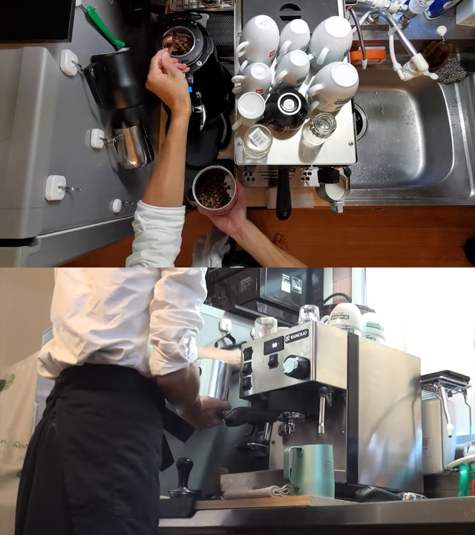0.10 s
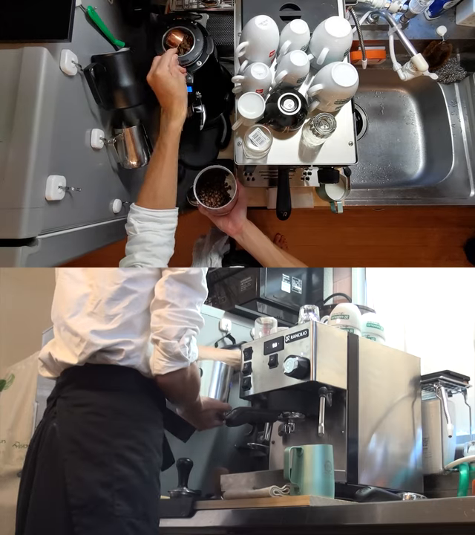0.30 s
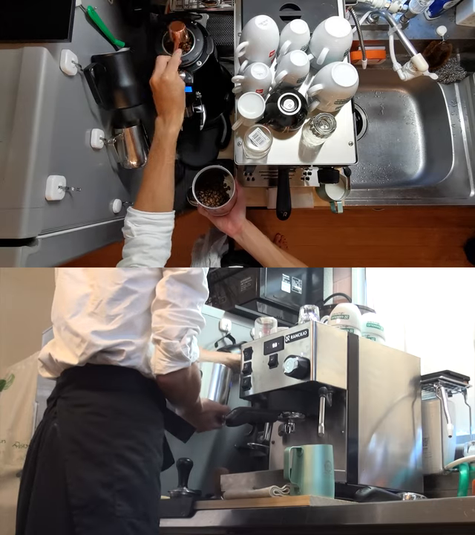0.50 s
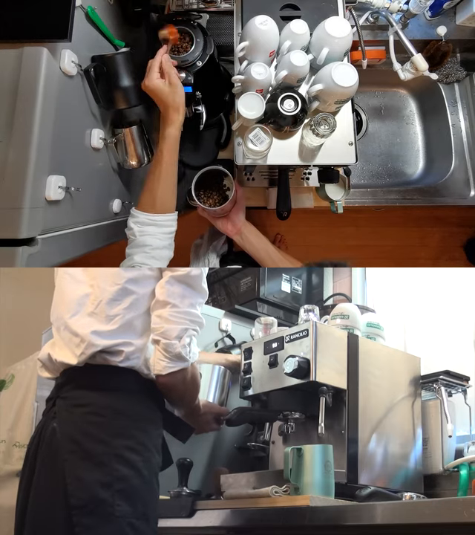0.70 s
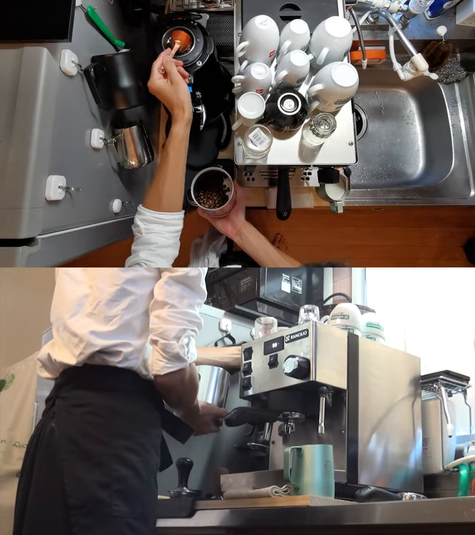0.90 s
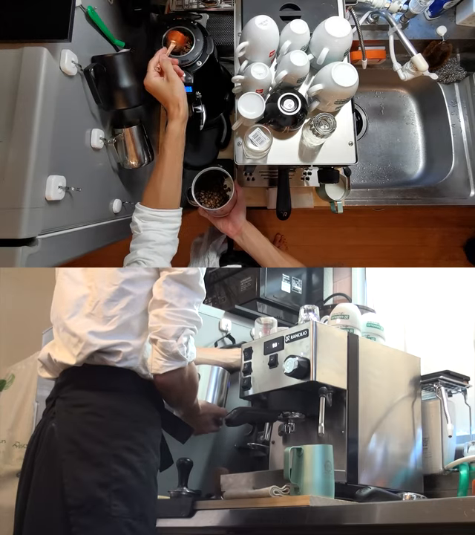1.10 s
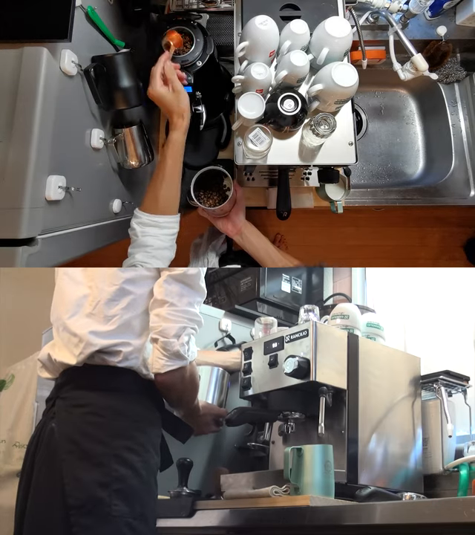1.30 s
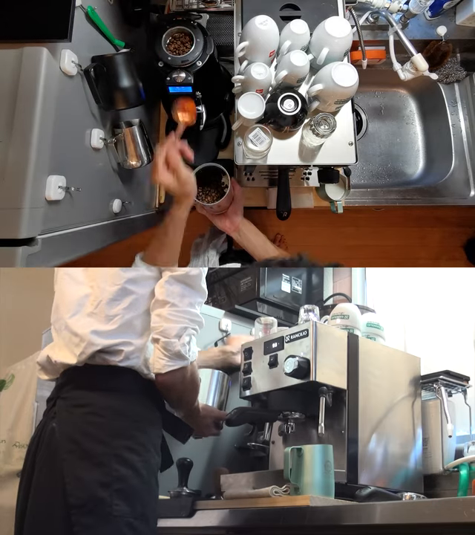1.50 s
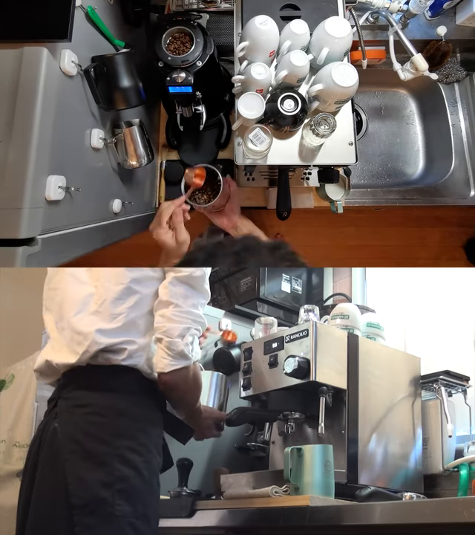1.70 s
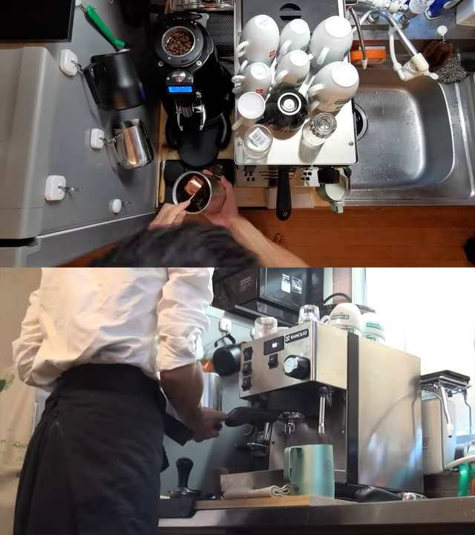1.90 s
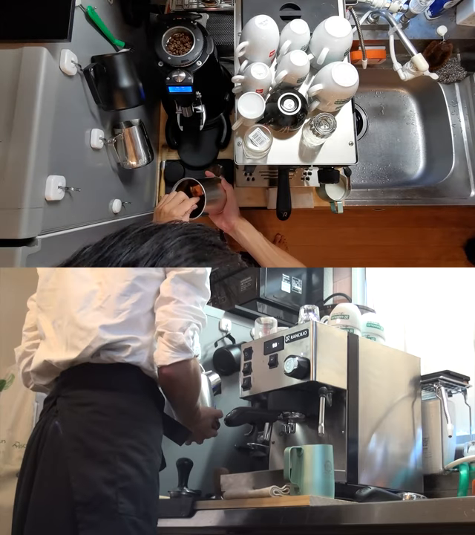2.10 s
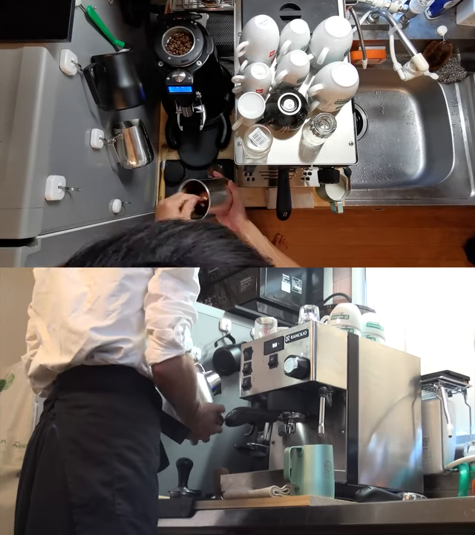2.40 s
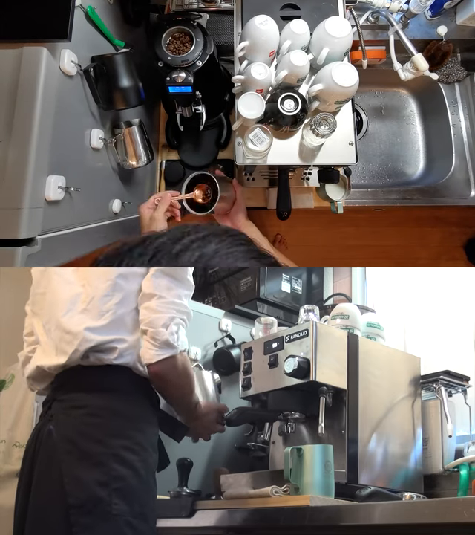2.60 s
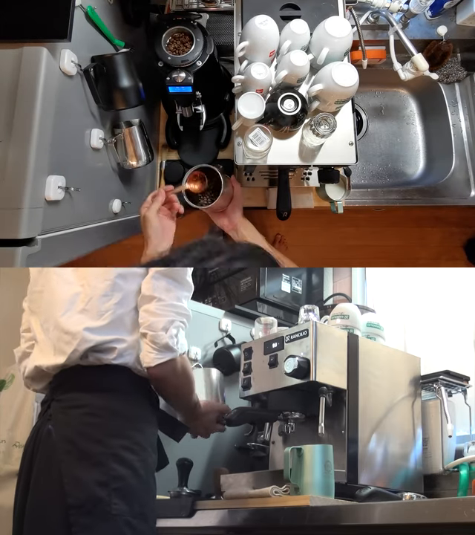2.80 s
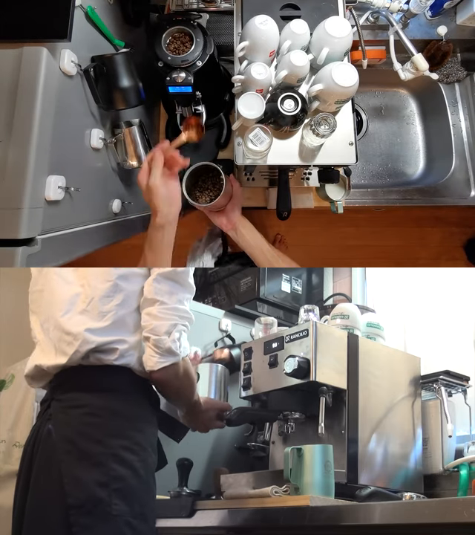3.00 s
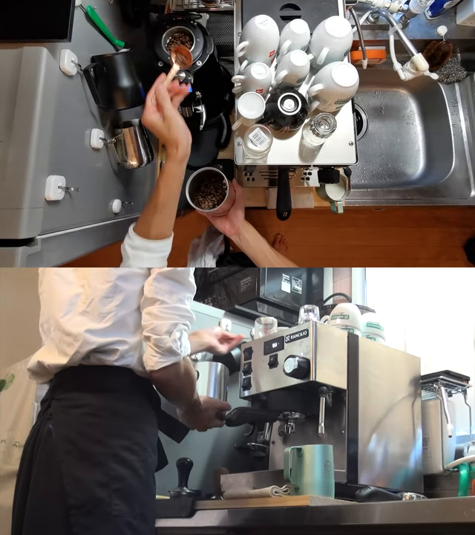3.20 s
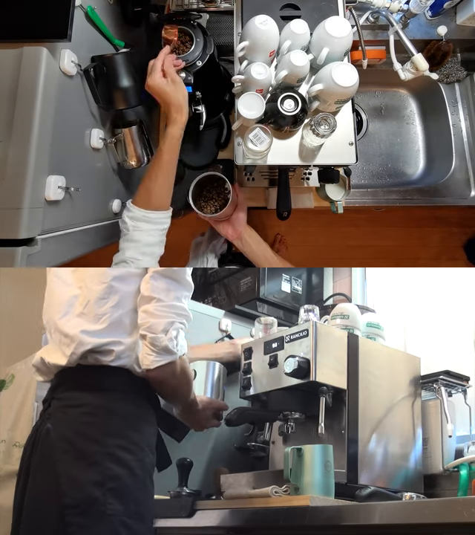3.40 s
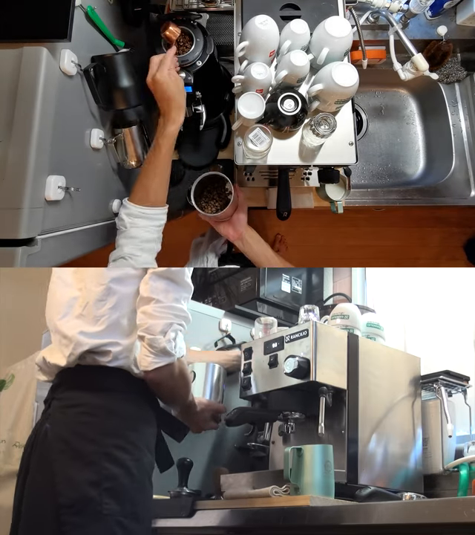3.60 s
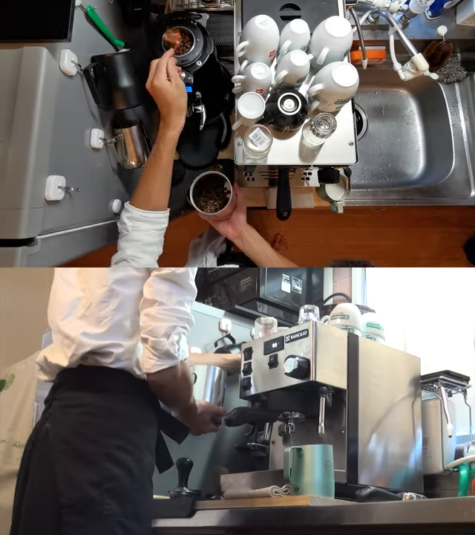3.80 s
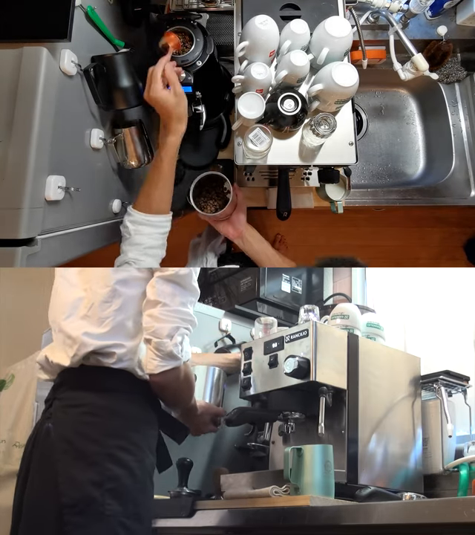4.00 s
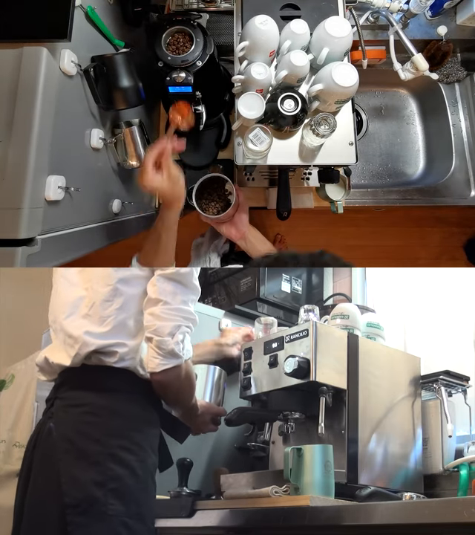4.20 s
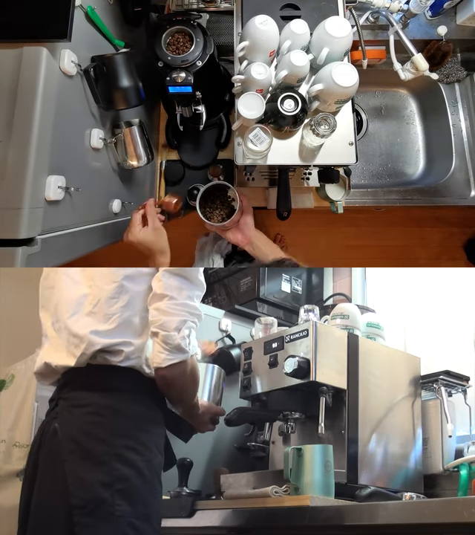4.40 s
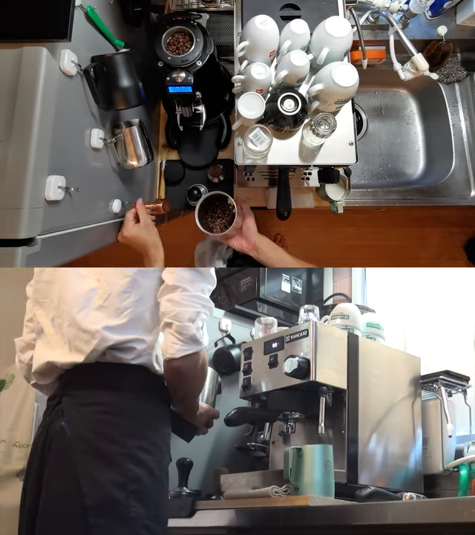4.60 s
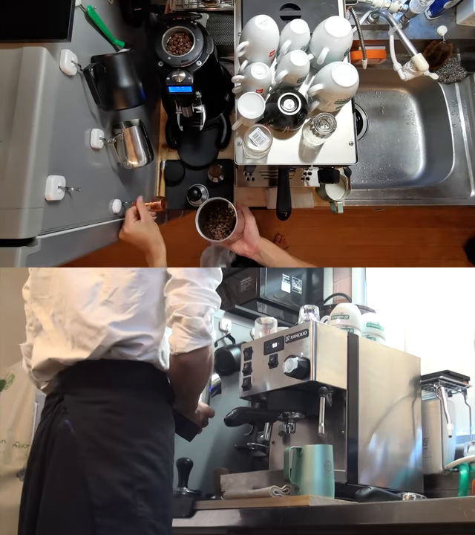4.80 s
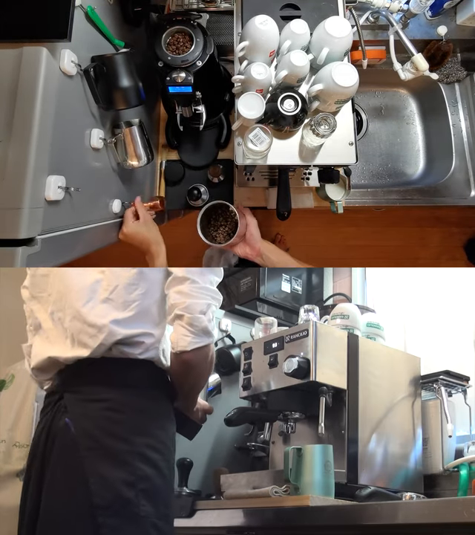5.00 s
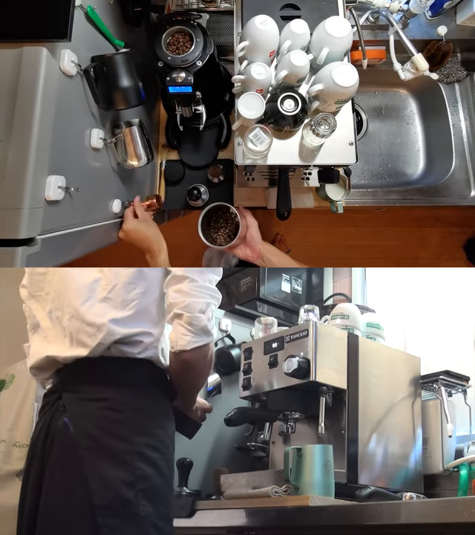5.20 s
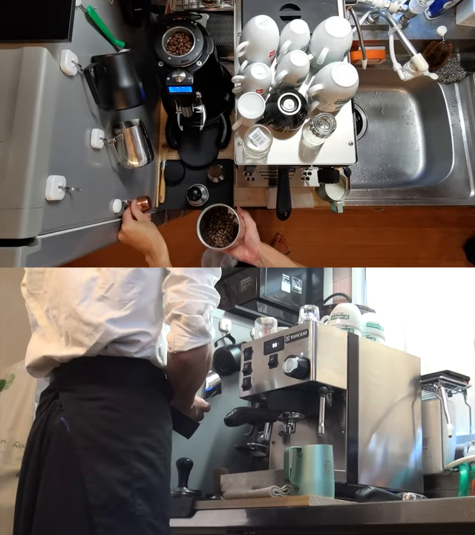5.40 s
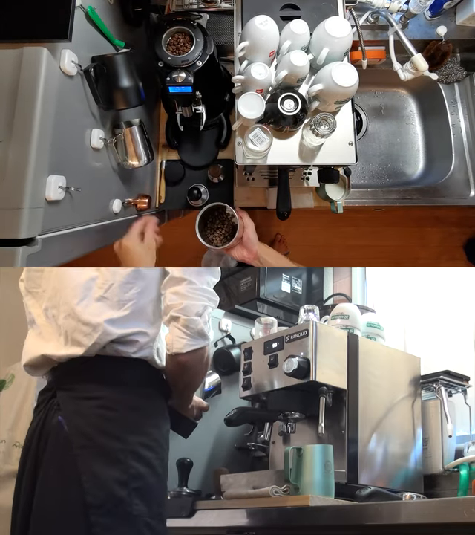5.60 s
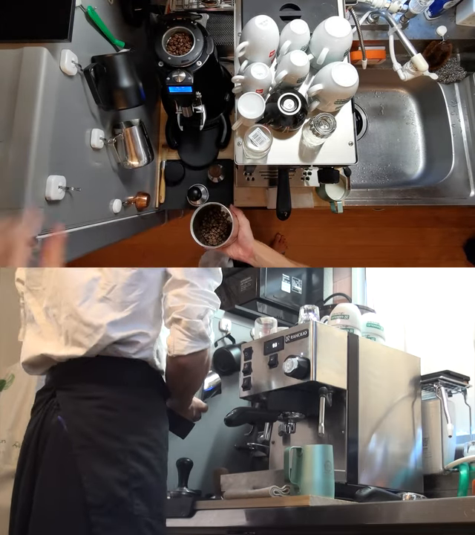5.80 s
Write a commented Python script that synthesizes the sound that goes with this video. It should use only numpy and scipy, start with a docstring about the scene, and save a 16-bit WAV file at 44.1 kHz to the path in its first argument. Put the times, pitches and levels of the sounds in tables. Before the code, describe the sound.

In a small kitchen, a metal spoon knocks a plastic grinder hopper and coffee beans patter in, followed by light scrapes and dull bumps. The spoon crunches into beans in a steel cup, clacking against its wall, and a few more beans tick into the hopper. Finally the spoon taps a tray, drops and bounces with a low boom. A faint sleeve rustle and a steady low machine hum are heard, all fairly close.

```python
"""Coffee beans slide off a spoon and patter into a grinder's plastic hopper, in a small kitchen.
The spoon knocks the hopper, crunches a second scoop out of a steel cup, tips that in too,
and is laid on a tray, where it bounces and makes the tray boom. Its bowl rings high and thin
when it is struck or scraped. A sleeve brushes as the arm moves, and a machine hums low throughout."""
import sys
import numpy as np
from scipy import signal
from scipy.fft import rfft, irfft
from scipy.io import wavfile

SR = 44100
rng = np.random.default_rng(int(sys.argv[2]) if len(sys.argv) > 2 else 0)


def put_to_file(sound):
    """Save the sound as 16-bit audio at rate SR, in the file named by the first command-line argument."""
    columns = np.atleast_2d(sound).T  # one column per channel
    safe = np.clip(columns, -1, 1)
    whole_steps = np.round(safe * 32767)
    wavfile.write(sys.argv[1], SR, whole_steps.astype(np.int16))


N = 256220
TIME = np.arange(N) / SR
RING_TIME = np.arange(SR // 2) / SR
HIT_SIZE = np.sqrt(SR / 100)  # gives a hit the energy of 10 ms of sound at level 1


def amp(db):
    """Turns decibels into a gain to multiply by."""
    return 10 ** (np.asarray(db) / 20)


def look_up(table, hz):
    """A table's value at any frequency, blended between its rows along a scale of octaves."""
    freqs, values = np.transpose(table)
    return np.interp(np.log(hz + 1), np.log(freqs), values)


def unit(x):
    """Scales a sound to an energy of 1."""
    return x / np.sqrt(np.sum(x ** 2) + 1e-20)


def add(mix, start, sound):
    """Mixes a sound in at a start time in seconds."""
    part = mix[max(round(start * SR), 0):][:len(sound)]
    part += sound[:len(part)]


def convolve(x, response):
    """Lets every sample of x set off its own copy of the response."""
    return signal.fftconvolve(x, response)[:len(x)]


def drift(per_s):
    """A slow random wobble, about 1 in size; a higher per_s makes it quicker."""
    keep_slow = np.exp(-(np.fft.rfftfreq(N, 1 / SR) / per_s) ** 2)
    return np.sqrt(N) * unit(irfft(rfft(rng.standard_normal(N)) * keep_slow, N))


def stroke(start, length, rise_s, fade_db_per_s):
    """The strength of one movement: it rises, holds until its length is up, then dies away."""
    t = TIME - start
    return np.clip(t / rise_s, 0, 1) * amp(-fade_db_per_s * np.clip(t - length, 0, 1))


def click(tone, tilt=0, size=4096):
    """One sharp click shaped by a tone table; tilt brightens it, in dB per octave."""
    hz = abs(np.fft.fftfreq(size, 1 / SR))
    log_gain = np.log(amp(look_up(tone, hz) + tilt * np.log2(hz + 50)))
    spectrum = np.exp(np.conj(signal.hilbert(log_gain)))  # packs the energy at the start
    return unit(np.fft.ifft(spectrum).real[:size // 2])


def hit(tone, t60, scatter, tilt=0):
    """A click, then a noisy shudder that is scatter times as strong and drops 60 dB in t60 seconds."""
    shudder = scatter * unit(rng.standard_normal(len(RING_TIME)) * amp(-60 * RING_TIME / t60))
    shudder[0] += 1
    return HIT_SIZE * unit(convolve(shudder, click(tone, tilt)))


def ring(notes, length=1):
    """The notes of a struck object; each drops 60 dB in its ring time multiplied by length."""
    return sum(amp(db - 60 * RING_TIME / (t60 * length)) * np.sin(2 * np.pi * hz * RING_TIME)
               for hz, db, t60 in notes)


def rattle(gain, per_s, spread_db):
    """Countless tiny collisions at random times, mostly small, growing and fading with gain."""
    chance, size, sign = rng.random(N), rng.exponential(1, N), rng.choice([-1, 1], N)
    hits = (chance < per_s / SR) * sign * amp(spread_db * np.minimum(size, 3.5))
    return np.sqrt(N) * unit(hits) * gain


# how alike the room sounds on the left and right: (frequency [Hz], likeness [0 to 1])
LIKENESS = [(40, 1), (130, 0.91), (300, 0.8), (600, 0.45), (1200, 0), (4000, 0), (16000, 0)]


def diffuse(spectra, hz):
    """Makes left and right alike in the bass, because long waves reach both sides together."""
    same = np.clip(look_up(LIKENESS, hz), -1, 1)[:, None]
    return np.array([spectra[0], same * spectra[0] + np.sqrt(1 - same ** 2) * spectra[1]])


# how long the kitchen echoes: (frequency [Hz], time to drop 60 dB [s])
ECHO_TIMES = [(150, 0.23), (400, 0.29), (900, 0.45), (2500, 0.34), (6000, 0.28), (10000, 0.25),
              (16000, 0.25)]


def in_room(x, echo_db, left_db, lag_ms=0):
    """Adds echoes off counter and walls; the direct sound is left_db louder, lag_ms later on the left."""
    echoes = rng.standard_normal((2, SR // 2)) * (rng.random((2, SR // 2)) < .15)
    echoes[:, :SR // 400] = 0
    hz, t, spectra = signal.stft(echoes, SR, nperseg=256)
    fade = amp(-60 * t / look_up(ECHO_TIMES, hz)[:, None])
    tails = signal.istft(diffuse(spectra, hz) * fade, SR, nperseg=256)[1]
    delayed = np.roll(x, round(lag_ms * SR / 1000))
    direct = np.array([amp(left_db / 2) * delayed, amp(-left_db / 2) * x])
    return direct + amp(echo_db) * np.array([convolve(x, unit(tail)) for tail in tails])


# Levels in all tables are relative: the function that plays them sets the final loudness.
# the machine's low notes: (frequency [Hz], level [dB])
HUM_NOTES = [(37.7, -52.5), (59.8, -63), (78, -77.5), (156.5, -72.5)]
# the tone of the room's rumble and hiss: (frequency [Hz], level [dB])
AIR_TONE = [(20, -8.5), (35, -8.5), (48, -0.5), (60, -0.5), (90, -7), (130, -13.5), (200, -20.5),
            (300, -24), (620, -22.5), (800, -26), (1350, -40), (2400, -41), (5000, -47), (9000, -50),
            (16000, -47.5)]


def room_hum():
    """A wavering machine hum over the soft rumble and hiss of the room."""
    hum = np.zeros(N)
    for hz, db in HUM_NOTES:
        gain = amp(db + 3.25 * drift(per_s=2.55))
        hum += gain * np.sin(2 * np.pi * (hz * TIME + rng.random()) + 0.22 * drift(per_s=4.9))
    hz, _, noise = signal.stft(rng.standard_normal((2, N)), SR, nperseg=4096)
    shaped = diffuse(noise, hz) * amp(look_up(AIR_TONE, hz))[:, None]
    air = signal.istft(shaped, SR, nperseg=4096)[1][:, :N]
    lean_right = amp([[-.8], [.8]])
    return np.sqrt(2) * (hum + amp(-54) * np.sqrt(N) * unit(air)) * lean_right


# the spoon knocking the hopper: (time [s], level [dB])
HOPPER_KNOCKS = [(0.0844, -30.5), (0.238, -39.5), (0.3853, -39.5)]
# the tone of a knock on plastic: (frequency [Hz], level [dB])
HOPPER_TONE = [(300, -53), (540, -39), (680, -13), (880, -30), (1150, -19.5), (1500, -21), (2000, -15),
               (2280, -4.5), (3000, -18), (3700, -15), (4200, -26.5), (4700, -23.5), (5800, -42),
               (16000, -47)]
# the hopper's own notes: (frequency [Hz], level [dB], ring time before shortening [s])
HOPPER_NOTES = [(670, -37, 0.14), (1740, -4, 0.02), (2170, -4, 0.033), (2330, -6, 0.04), (2760, -11, 0.036),
                (3740, -6, 0.017), (4670, -11.5, 0.15)]


def hopper_knocks():
    """The spoon knocks the plastic hopper, which rings only for a moment."""
    knocks = np.zeros(N)
    for start, db in HOPPER_KNOCKS:
        add(knocks, start, amp(db - 13) * hit(HOPPER_TONE, t60=0.02, scatter=4.9))
        add(knocks, start, amp(db - 15) * ring(HOPPER_NOTES, length=0.4))
    return in_room(knocks, echo_db=6.5, left_db=-5)


# beans sliding into the hopper or back into the cup: (time [s], length [s], level [dB], fade [dB/s])
POURS = [(0.214, 0.21, -51.5, 118), (0.631, 0.07, -57.5, 332), (2.937, 0.092, -68.5, 300),
         (3.698, 0.021, -54, 240)]
# the tone of one bean's click: (frequency [Hz], level [dB])
BEAN_TONE = [(300, -20), (650, -16), (1100, -10), (2300, -1.5), (3200, -3), (4700, 0), (5600, -1.5),
             (6800, 3), (9500, 3.5), (14000, 4.5), (16000, -2.5)]


def pouring_beans():
    """A few beans trickle ahead, then the spoonful slides and patters onto the heap below."""
    lead_s, rise_s = 0.046, 0.0052
    flow = np.zeros(N)
    for start, length, db, fade in POURS:
        trickle = amp(-8.5) * stroke(start - lead_s, lead_s, rise_s, fade)
        slide = stroke(start, length, rise_s, fade)
        flow += amp(db) * np.maximum(trickle, slide)
    hits = rattle(flow, per_s=1700, spread_db=8)
    return in_room(amp(-4) * convolve(hits, click(BEAN_TONE)), echo_db=6, left_db=-4, lag_ms=-.14)


# single beans snapping past the spoon or landing: (time [s], level [dB])
SNAPS = [(0.2227, -45), (0.4588, -42.5), (0.5297, -50), (0.65, -57), (2.258, -65), (2.3077, -48),
         (2.321, -44), (2.3618, -38), (2.5108, -39), (2.5327, -35), (2.641, -49), (3.703, -47.5),
         (3.7338, -48)]


def snapping_beans():
    """Single hard beans crack louder than the rest."""
    snaps = np.zeros(N)
    for start, db in SNAPS:
        add(snaps, start, amp(db - 6) * hit(BEAN_TONE, t60=0.023, scatter=1.6, tilt=0.93))
    return in_room(snaps, echo_db=-0.5, left_db=-6, lag_ms=.2)


# the notes of the spoon's bowl, two low and six high: (frequency [Hz], level [dB], full ring time [s])
BOWL_NOTES = [(6478, -3, 0.25), (6580, -10, .07), (10230, -4, 0.14), (10420, 0, 0.08), (13128, 8, .12),
              (14620, -3, 0.13), (15060, 7, .15), (15280, 4, .1)]
# what holding the spoon does to those notes: (frequency [Hz], level change [dB])
FINGER_MUTE = [(10400, 1.5), (13128, -29), (14620, -4), (15200, -21)]


def bowl_notes(held):
    """The notes of the spoon's bowl, some of them muffled when fingers hold it."""
    return [(hz, db + held * look_up(FINGER_MUTE, hz), t60) for hz, db, t60 in BOWL_NOTES]


# the spoon dragging over hopper or cup: (time [s], length [s], low notes [dB], high notes [dB])
SCRAPES = [(0.62, 0.06, -67, -78), (1.15, 0.047, -63, -63.5), (1.235, 0.04, -55, -68),
           (1.391, 0.027, -58.5, -58), (2.824, 0.032, -71, -78), (2.997, 0.053, -52.5, -67.5),
           (3.209, 0.038, -68.5, -81)]


def spoon_scrapes():
    """Tiny slips of metal on a rim hiss and keep the spoon's bowl singing."""
    low_gain, high_gain = np.zeros((2, N))
    for start, length, low_db, high_db in SCRAPES:
        pressure = stroke(start, length, rise_s=0.007, fade_db_per_s=265)
        low_gain += amp(low_db) * pressure
        high_gain += amp(high_db) * pressure
    low_slips, high_slips = (rattle(gain, per_s=1300, spread_db=4) for gain in (low_gain, high_gain))
    notes = bowl_notes(held=True)
    low_ring = amp(-5.5) * convolve(low_slips, unit(ring(notes[:2], length=0.21)))
    high_ring = amp(-1) * convolve(high_slips, unit(ring(notes[2:], length=0.45)))
    hiss = amp(-6) * convolve(high_slips, click(BEAN_TONE))
    return in_room(low_ring + high_ring + hiss, echo_db=-0.5, left_db=4)


# bumps against the grinder: (time [s], level [dB], brightness [dB/octave])
BUMPS = [(0.866, -40.5, -8), (0.8767, -43.5, -0.5), (1.038, -47.5, -2), (1.050, -44, -1)]
# the tone of the grinder's body: (frequency [Hz], level [dB])
BUMP_TONE = [(50, -6), (120, -1), (190, -11.5), (262, 7), (340, 3), (430, -14), (570, -5), (780, -14),
             (1000, -23), (1600, -34), (2000, -24), (2600, -38), (8000, -63)]


def grinder_bumps():
    """The grinder is bumped and gives a short, dull shudder."""
    bumps = np.zeros(N)
    for start, db, tilt in BUMPS:
        add(bumps, start, amp(db) * hit(BUMP_TONE, t60=0.062, scatter=2.1, tilt=tilt))
    return in_room(bumps, echo_db=1.5, left_db=2.5)


# light touches on the hopper's rim: (time [s], level [dB])
RIM_TOUCHES = [(1.037, -54.5), (3.6022, -58), (3.6459, -55), (3.7035, -53), (4.0706, -56.5)]
# the notes of the spoon on the rim: (frequency [Hz], level [dB], ring time [s])
RIM_NOTES = [(2395, 1, 0.24), (2850, -12, 0.25), (3820, -13, 0.16), (4680, 3, 0.3), (6030, -2, 0.22),
             (6480, 6, 0.086), (7830, -2, 0.075), (8950, -1, 0.1)]
# the tone of the spoon's tick: (frequency [Hz], level [dB])
TICK_TONE = [(1000, -17), (1500, -25), (1900, -1.5), (2400, -8), (3000, -7), (3800, 0.5), (4200, -4),
             (4680, 2), (5200, -3), (7500, 1), (8800, -8.5), (10500, -3.5), (13000, -16), (16000, -20)]


def rim_touches():
    """The spoon grazes the hopper's rim with a tick and a faint, thin ring."""
    touches = np.zeros(N)
    for start, db in RIM_TOUCHES:
        add(touches, start, amp(db - 24) * ring(RIM_NOTES))
        add(touches, start, amp(db - 20.5) * hit(TICK_TONE, t60=0.079, scatter=2.9))
    return in_room(touches, echo_db=7.5, left_db=-11)


# the arm reaching and returning: (time of fastest movement [s], half length [s], level [dB])
ARM_MOVES = [(1.16, 0.12, -66.5), (1.752, 0.19, -71.5), (2.16, 0.14, -77), (3.12, 0.072, -67.5),
             (3.274, 0.15, -72), (4.125, 0.063, -71.5), (4.518, 0.22, -70)]
# the tone of rubbing cloth: (frequency [Hz], level [dB])
CLOTH_TONE = [(500, -14), (1500, -1.5), (2700, 1.5), (4000, -7.5), (6500, -4.5), (10000, -10.5),
              (16000, -10.5)]


def sleeve_rustle():
    """Cloth fibres catch on each other, swelling and fading with each move of the arm."""
    speed = sum(amp(db) * np.exp(-((TIME - peak) / half) ** 2) for peak, half, db in ARM_MOVES)
    catches = rattle(speed, per_s=5000, spread_db=3)
    return in_room(amp(-10) * convolve(catches, click(CLOTH_TONE)), echo_db=3, left_db=18)


# the tone of beans crunching: (frequency [Hz], level [dB])
CRUNCH_TONE = [(500, -45), (1050, -20), (1500, -11), (2100, 0.5), (2700, -1.5), (3100, -1), (3600, 0),
               (4300, 2.5), (5300, 2), (6400, 3), (7500, -0.5), (10000, -7), (15500, -14)]
# the hollow tone of the air in the cup: (frequency [Hz], level [dB])
HOLLOW_TONE = [(250, -46), (380, -12), (480, -10.5), (545, 4), (578, 9.5), (615, 0.5), (700, -9),
               (850, -20), (1200, -49.5)]
CUP_MOUTH_LEFT_DB = 9  # the open end faces left


def digging_beans():
    """The spoon ploughs in; beans crunch together in clumps and make the air in the cup sound."""
    start = 2.3
    bite_db = 8 * np.exp(-((TIME - start) / 0.051) ** 2)  # extra crunch as the spoon breaks in
    effort = amp(-49 + bite_db) * stroke(start, length=0.37, rise_s=0.023, fade_db_per_s=198)
    hits = rattle(effort, per_s=1800, spread_db=3.5) * amp(1.77 * drift(per_s=39))
    crunch = convolve(hits, click(CRUNCH_TONE))
    hollow = amp(-7) * convolve(hits, click(HOLLOW_TONE))
    return (in_room(crunch, echo_db=3.5, left_db=0, lag_ms=.1)
            + in_room(hollow, echo_db=-1.5, left_db=CUP_MOUTH_LEFT_DB, lag_ms=-0.15))


# the spoon's bowl being struck: (time [s], low notes [dB], high notes and tick [dB])
CLINKS = [(2.3017, -46, -66), (2.81, -39, -68), (2.8374, -35, -61), (3.0051, -37, -53), (3.1009, -50, -73),
          (3.259, -50.5, -78), (4.8279, -44, -44), (4.8474, -39.5, -68), (5.1216, -53, -47),
          (5.3263, -47.5, -63), (5.6191, -43.5, -81), (5.671, -32, -45.5), (5.6824, -36, -52)]


def spoon_clinks():
    """A sharper touch ticks and wakes the bowl's high notes; beans and fingers shorten the ring."""
    lift_s, let_go_s = 2.9, 5.65  # the spoon leaves the beans; the fingers release it
    buried_ring, held_ring, free_ring = 0.11, 0.41, 0.54  # shares of the full ring time
    clinks = np.zeros(N)
    for start, low_db, high_db in CLINKS:
        held = start < let_go_s
        notes = [(hz, db + (high_db if hz > 8000 else low_db), t60) for hz, db, t60 in bowl_notes(held)]
        length = buried_ring if start < lift_s else held_ring if held else free_ring
        tick = amp(high_db - 1) * hit(BEAN_TONE, t60=0.013, scatter=11, tilt=14)
        add(clinks, start, ring(notes, length) + tick)
    return in_room(amp(-1.5) * clinks, echo_db=-1, left_db=-3, lag_ms=0.48)


# the spoon knocking in the cup: (time [s], bean crunch [dB], wall ring [dB], hollow hoot [dB])
CUP_KNOCKS = [(2.3326, -41, -38.5, -43.5), (2.4249, -44.5, -43, -37.5), (2.5321, -43, -47, -51.5),
              (2.6423, -41.5, -36.5, -45.5), (2.7177, -42, -29.5, -37)]
# the notes of the cup's steel wall: (frequency [Hz], level [dB], ring time [s])
WALL_NOTES = [(1842, -11, 0.044), (2795, -20, 0.065), (3550, -7.5, 0.035), (3620, 0, 0.019),
              (5260, -1.5, 0.012), (6500, -10, 0.029)]


def cup_knocks():
    """The spoon crushes beans on the cup's wall; muffled by a hand, it clacks as the air inside hoots."""
    wall, hollow = np.zeros((2, N))
    for start, crunch_db, wall_db, hollow_db in CUP_KNOCKS:
        add(wall, start, amp(wall_db) * ring(WALL_NOTES))
        add(wall, start, amp(crunch_db) * hit(CRUNCH_TONE, t60=0.042, scatter=4))
        add(hollow, start, amp(hollow_db) * HIT_SIZE * click(HOLLOW_TONE))
    return (in_room(wall, echo_db=0.5, left_db=-6)
            + in_room(hollow, echo_db=-2, left_db=CUP_MOUTH_LEFT_DB, lag_ms=-0.12))


# the spoon meeting the tray: (time [s], thud [dB], tick [dB], handle ring [dB])
TRAY_HITS = [(4.662, -55, -45.5, -72), (4.827, -40, -44.5, -52.5), (5.122, -39, -51, -74),
             (5.139, -43, -55, -79), (5.325, -46.5, -60.5, -52.5), (5.39, -48, -58, -67),
             (5.604, -21.5, -48, -60), (5.619, -29, -61, -62), (5.669, -20.5, -35, -45),
             (5.68, -45, -38, -64)]
# the notes of the tray and of the spoon's flexing handle: (frequency [Hz], level [dB], ring time [s])
TRAY_NOTES = [(185, -14.5, 0.42), (217.6, -15, 0.33), (289.2, -1, 0.18), (343, -2.5, 0.38),
              (436, -6.5, 0.16), (547, -15.5, 0.25), (790, -18, 0.52), (950, -29, 0.18)]
HANDLE_NOTES = [(1212, 4.5, 0.19), (1300, -6.5, 0.23), (4689, -11.5, 0.33), (8040, -16, 0.25)]
# the tones of the low thud and of a hard hit's clack: (frequency [Hz], level [dB])
THUD_TONE = [(60, -30), (150, -12), (300, 5), (450, -2.5), (620, 4), (900, -7.5), (1300, -19), (2500, -76)]
CLACK_TONE = [(700, -10.5), (1100, -6), (1350, -9), (1640, 5), (1890, 4.5), (2060, -7), (2300, -3),
              (3000, -14.5), (6000, -45)]


def spoon_on_tray():
    """The spoon ticks against the tray, then drops and bounces, and the tray booms."""
    boom, thud, bright = np.zeros((3, N))
    for start, thud_db, tick_db, handle_db in TRAY_HITS:
        clack_db = -35.5 + 2.1 * (thud_db + 20)  # grows faster than the thud, so hard hits clack
        add(boom, start, amp(thud_db - 11) * ring(TRAY_NOTES))
        add(thud, start, amp(thud_db - 11.5) * hit(THUD_TONE, t60=0.17, scatter=6.6))
        add(bright, start, amp(clack_db) * hit(CLACK_TONE, t60=0.011, scatter=7))
        add(bright, start, amp(handle_db - 9.5) * ring(HANDLE_NOTES))
        add(bright, start, amp(tick_db - 6) * hit(TICK_TONE, t60=0.056, scatter=2.9))
    low = in_room(boom, echo_db=-7.5, left_db=-2) + in_room(thud, echo_db=3, left_db=7)
    return low + in_room(bright, echo_db=4, left_db=-7, lag_ms=0.89)


def scene():
    """Adds up all the sounds in the kitchen, in stereo."""
    beans = pouring_beans() + digging_beans() + snapping_beans()
    knocks = cup_knocks() + hopper_knocks() + rim_touches() + grinder_bumps()
    spoon = spoon_clinks() + spoon_scrapes() + spoon_on_tray()
    return beans + knocks + spoon + sleeve_rustle() + room_hum()


def record(dry):
    """Cuts away the very highest treble."""
    treble_cut = signal.firwin(511, cutoff=16150, window=("kaiser", 9), fs=SR)
    return signal.oaconvolve(dry, treble_cut[None], "same")


dry = scene()
out = record(dry)
put_to_file(out)
```